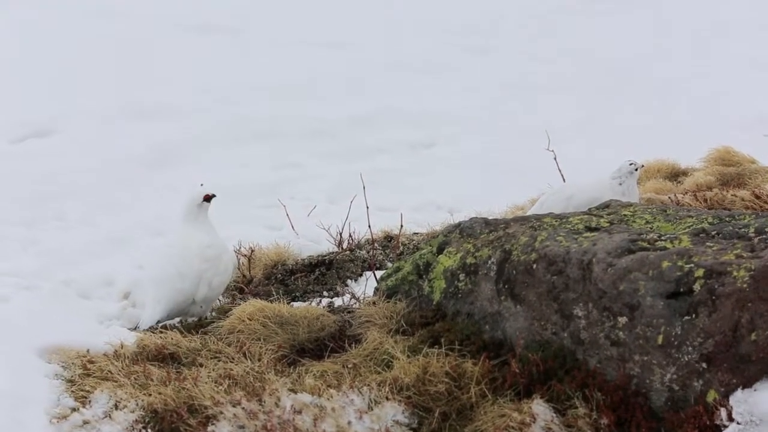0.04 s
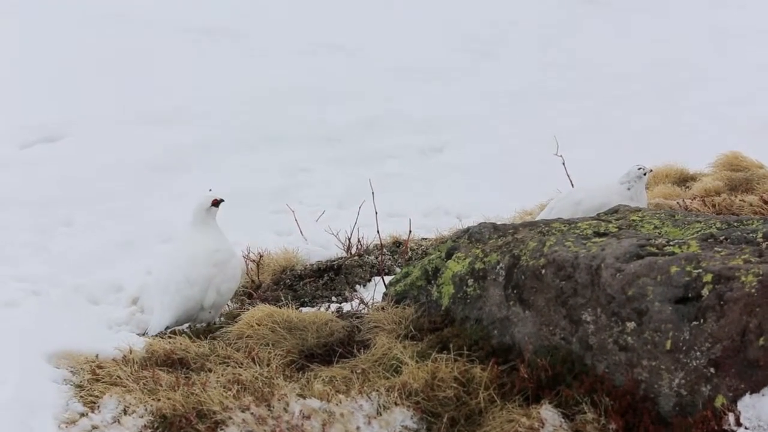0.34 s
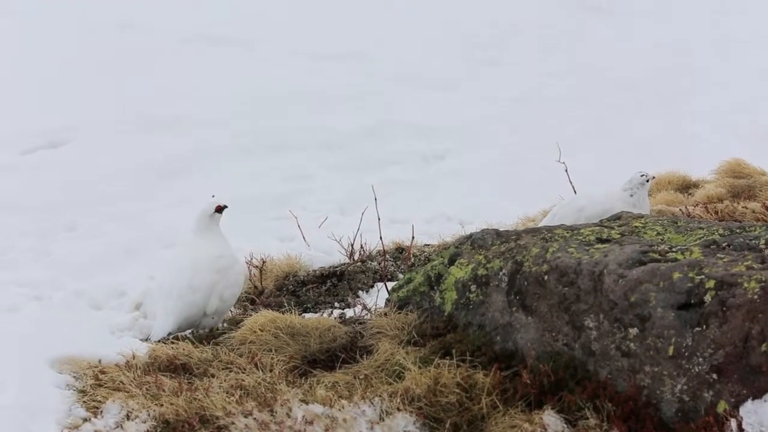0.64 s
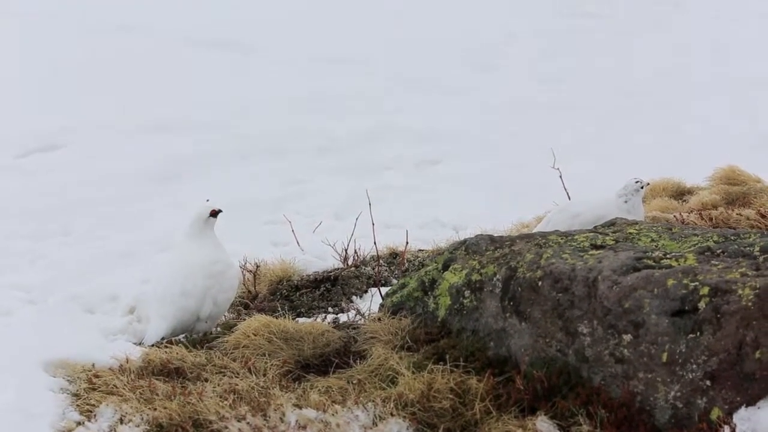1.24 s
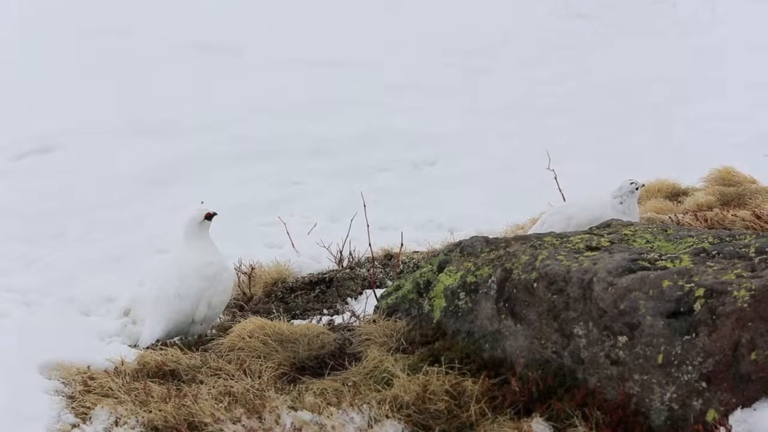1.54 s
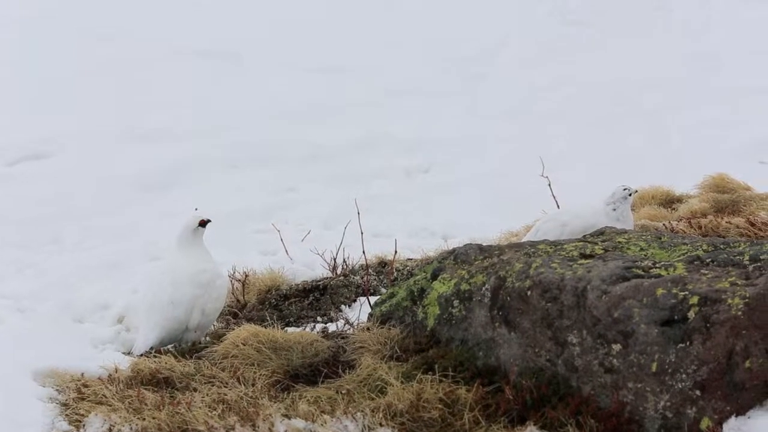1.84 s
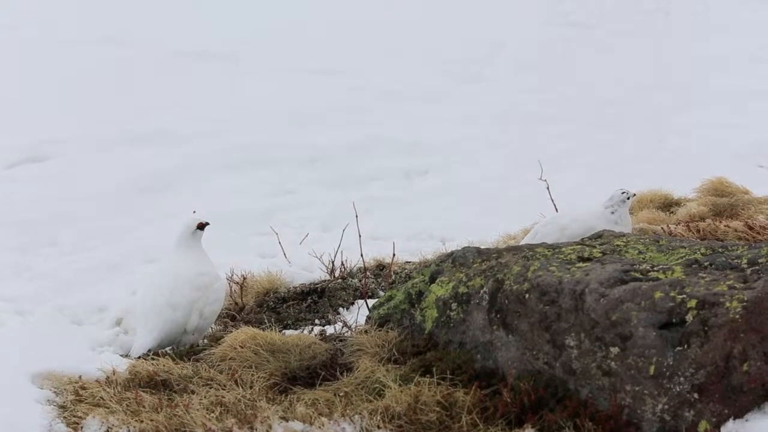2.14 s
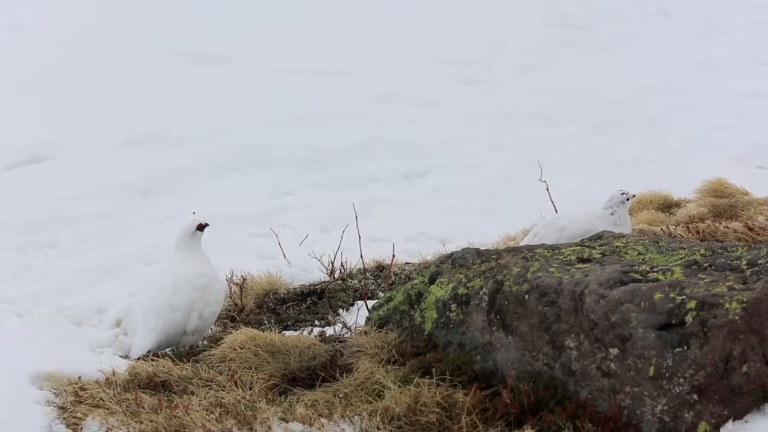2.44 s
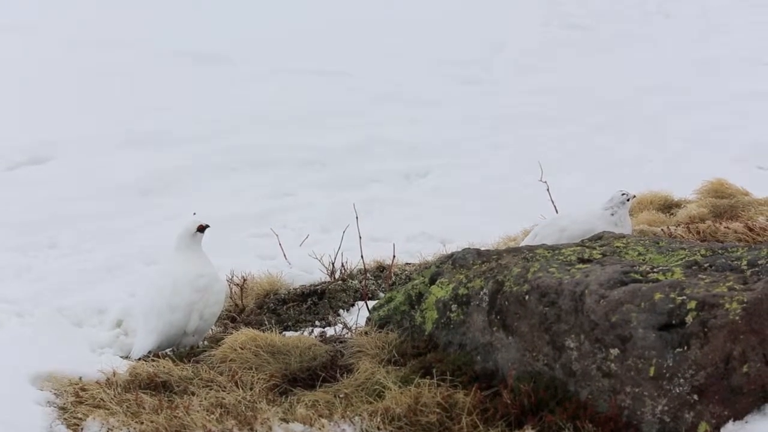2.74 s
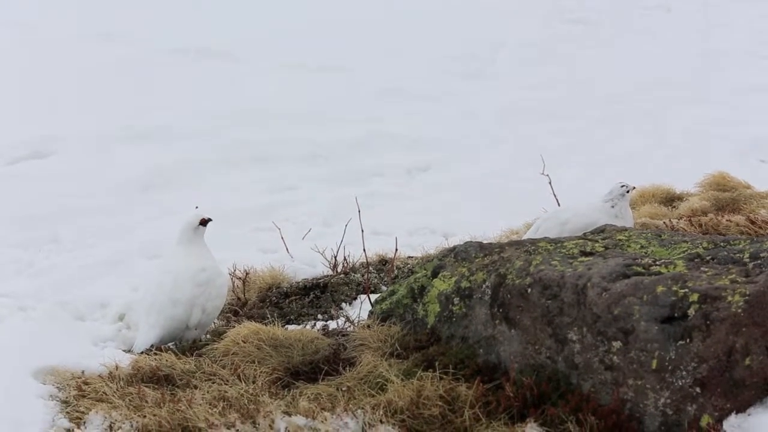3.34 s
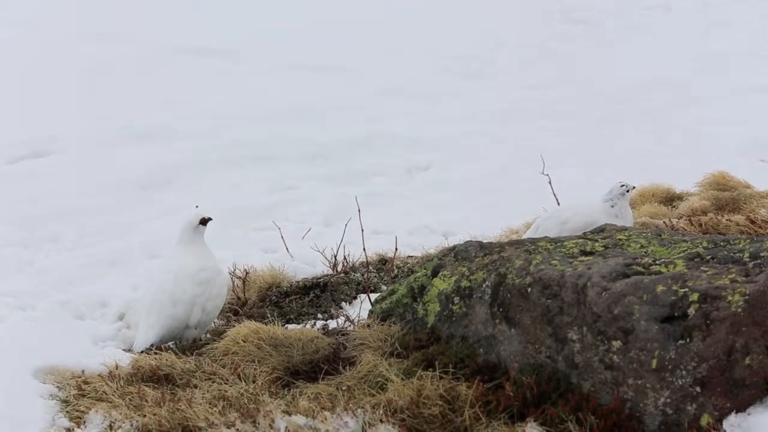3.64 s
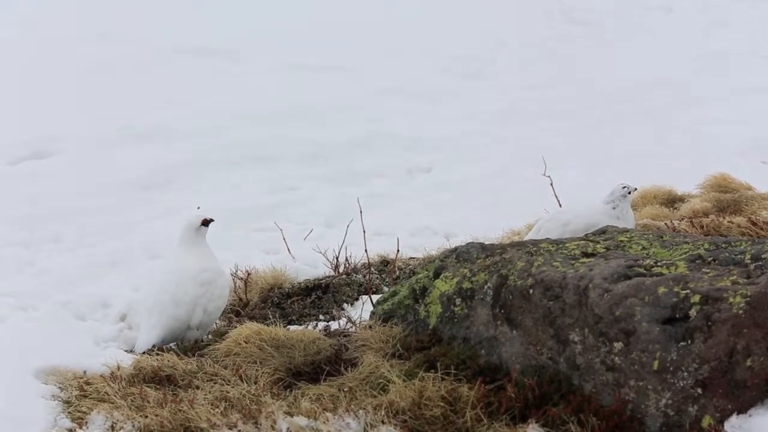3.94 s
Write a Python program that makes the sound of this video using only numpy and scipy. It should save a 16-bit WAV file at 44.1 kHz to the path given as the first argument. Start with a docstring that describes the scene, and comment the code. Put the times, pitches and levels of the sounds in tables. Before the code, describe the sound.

A ptarmigan gives low rattling croaks while wind rumbles on the microphone.

```python
"""A ptarmigan croaks on a snowy mountainside: two rattles of about 50 pulses/s and a few loose clucks.
Each pulse is a snap of the syrinx ringing three throat resonances; rock and snow scatter a faint tail.
Wind rumbles on the microphone, and single eddies thump across its port.
Handling ticks, faint crackle and one short rustle sound close by, over a steady hiss."""
import sys
import numpy as np
from scipy import signal
from scipy.fft import rfft, irfft, next_fast_len
from scipy.io import wavfile
from scipy.ndimage import map_coordinates

SR = 44100
rng = np.random.default_rng(int(sys.argv[2]) if len(sys.argv) > 2 else 0)


def transcribe(signal):
    """Save signal, clipped to [-1, 1], as a 16-bit WAV file at the path in sys.argv[1]."""
    frames = np.atleast_2d(signal).T
    limited = np.clip(frames, -1, 1)
    pcm = np.round(limited * 32767).astype(np.int16)
    wavfile.write(sys.argv[1], SR, pcm)


N = 176400
T = np.arange(N) / SR
NFFT = 4096
F_HZ = np.fft.rfftfreq(NFFT, 1 / SR)

# noise spectra: f/Hz, density/dB
HISS_SPECTRUM = [(290, -25), (500, 5), (648, 0), (839, 3.5), (927, -2), (1470, -3), (2100, -5), (2930, -7),
                 (11800, -11.5), (15500, -19.5)]
BRUSH_SPECTRUM = [(500, 5), (2500, -14), (4200, -8), (5100, -5.5), (6000, -14), (7200, -8), (10000, -14.5),
                  (16000, -23)]
RUMBLE_SPECTRUM = [(12, -58), (25, -2.5), (65, 2), (110, -0.5), (180, -8), (290, -18.5), (450, -31),
                   (700, -43), (1400, -75), (3000, -76)]
FLUTTER_SPECTRUM = [(60, -8), (180, -3), (300, 3), (550, -11), (800, -18), (1400, -28), (3000, -41)]
# envelopes: t/s, level/dB
HISS_ENVELOPE = [(0, -57.5), (.55, -54.5), (1.2, -53.5), (1.9, -55), (2.6, -53.5), (3.4, -52.5), (4, -54.5)]
WIND_ENVELOPE = [(0, -27), (.03, -25), (.06, -50), (.1, -33.5), (.15, -24.5), (.22, -40), (.26, -25.5),
                 (.33, -41.5), (.48, -30), (.6, -47), (.68, -28.5), (.78, -37), (.95, -35.5), (1.1, -32),
                 (1.2, -33.5), (1.3, -41.5), (1.43, -33.5), (1.5, -29), (1.55, -40), (1.66, -45),
                 (1.75, -32), (1.84, -46.5), (1.98, -27.5), (2.06, -27), (2.11, -21.5), (2.19, -21.5),
                 (2.25, -35), (2.3, -21.5), (2.38, -28), (2.44, -31), (2.53, -35), (2.57, -21),
                 (2.62, -33.5), (2.75, -35), (2.81, -23), (2.87, -36), (3.1, -38), (3.37, -38),
                 (3.45, -31.5), (3.69, -29.5), (3.75, -19.5), (3.87, -20), (3.93, -28), (4, -9.5)]
# brush strokes: centre t/s, sigma/s, level/dB
BRUSH_STROKES = [(0.102, 0.12, -47.5), (1.74, 0.051, -48.5), (1.832, 0.027, -55)]
# rustle snaps: t/s, peak/dB
RUSTLE_SNAPS = [(1.7312, -27.5), (1.743, -33), (1.75, -34), (1.7615, -25), (1.790, -33), (1.8011, -26),
                (1.816, -27), (1.8245, -28), (1.834, -34)]
# handling ticks: t/s, peak/dB, f/Hz, half-width/oct
HANDLING_TICKS = [(.297, -34.5, 7000, 0.56), (.333, -36, 2600, 0.76), (0.6678, -21.5, 11200, 0.24),
                  (0.767, -29.5, 1760, 0.6), (0.785, -36.5, 6000, .3), (.851, -23, 7000, 2.2),
                  (0.9028, -17.5, 2500, 1.1), (1.037, -26.5, 4000, 1.1), (1.369, -25, 1310, 0.48),
                  (1.525, -34.5, 3400, 0.55), (2, -28, 4000, 0.63), (2.0213, -16, 8460, 2.4),
                  (2.0647, -19, 2210, 0.78), (2.0952, -15, 2800, 1.04), (2.1297, -21, 9350, 1.1),
                  (2.5354, -28.5, 7450, .5), (2.563, -22, 1950, 0.54), (2.584, -23.5, 1700, 1),
                  (2.6105, -24, 13900, 0.11), (2.7066, -20.5, 4630, 0.44), (2.705, -19, 13500, 0.29),
                  (2.8095, -27, 8985, 0.89), (3.030, -29.5, 2600, 0.65), (3.1743, -23.5, 1800, 0.33),
                  (3.308, -26, 8900, 1), (3.4391, -23.5, 5800, 1.3), (3.472, -27, 9800, 0.76),
                  (3.7936, -27.5, 5800, .7), (3.9023, -28.5, 4900, 1.4)]
# eddies at the port: t/s, peak/dB, f/Hz
PORT_EDDIES = [(.004, -27, 169), (.02, -15, 99), (0.136, -6.5, 180), (0.1388, -9, 463), (0.201, -20.5, 107),
               (.25, -22.5, 145), (0.304, -26.5, 134), (.404, -23, 119), (0.4668, -22, 300),
               (0.683, -27, 193), (.747, -23.5, 125), (1.028, -27.5, 168), (1.13, -25, 142),
               (1.395, -27.5, 89.5), (1.5137, -10, 129.6), (2.104, -16.5, 196), (2.1569, -6.5, 167),
               (2.156, -19, 506), (2.329, -9.5, 96), (2.384, -18, 111), (2.488, -22, 177),
               (2.5567, -11.5, 153), (2.583, -19.5, 109), (2.818, -20.5, 294), (3.435, -20.5, 109),
               (3.668, -20, 109), (3.7652, -11.5, 265), (3.782, -14, 130), (3.831, -12.5, 180),
               (3.9011, -1.5, 175), (3.9001, -12.5, 574), (3.9965, -11, 145)]
# upper throat resonances: f/Hz, width/Hz, gain/dB
THROAT_MODES = [(2190, 135, 0), (2600, 220, -8)]
# rattles: t/s, pulse rate/Hz, peak/dB, throat tuning/ratio, hollow resonance gain/dB
SHORT_RATTLE = [(1.3685, 60, -28.5, 1.08, -3.5), (1.419, 56.6, -29, 0.96, -3),
                (1.519, 49.8, -33.5, 0.96, -1), (1.6, 55, -35.5, 0.96, 2)]
LONG_RATTLE = [(2.224, 45.65, -39, 1, -8), (2.287, 56.77, -34.5, 1, -9), (2.428, 51.83, -36.5, 1, -2.5),
               (2.568, 49.2, -38, 1.02, 9), (2.65, 47.06, -41.5, 1.04, 7), (2.739, 45.1, -39, 1.02, 5),
               (2.849, 49.9, -38, 0.97, 4), (2.998, 48.88, -35, 1.005, 0.5), (3.125, 44.2, -37, 0.96, -1)]
# clucks: t/s, peak/dB
LOOSE_CLUCKS = [(0.1192, -40), (0.1431, -38), (1.235, -32.5), (1.255, -30), (1.993, -30), (2.009, -31),
                (2.03, -34), (3.21, -39), (3.315, -38.5), (3.348, -37), (3.426, -37), (3.445, -39),
                (3.543, -37), (3.563, -42), (3.643, -43), (3.712, -43)]


def amp(db):
    """dB to gain."""
    return 10 ** (np.asarray(db) / 20)


def curve(rows):
    """Linear interpolation of (t/s, value) rows."""
    return np.interp(T, *np.transpose(rows))


def wobble(rate_hz):
    """Spline through Gaussian random knots."""
    return map_coordinates(rng.standard_normal(int(N * rate_hz / SR) + 4), [T * rate_hz])


def filtered(x, response):
    """FFT filter; response maps f/Hz to gain."""
    size = next_fast_len(N + SR // 4)
    return irfft(rfft(x, size) * response(np.fft.rfftfreq(size, 1 / SR)), size)[:N]


def butterworth(order, cutoff_hz, kind):
    """Complex analog response on F_HZ."""
    return signal.freqs(*signal.butter(order, cutoff_hz, kind, analog=True), F_HZ)[1]


def noise(spectrum):
    """Coloured noise, rms 1."""
    knots_hz, db = np.transpose(spectrum)
    white = rng.standard_normal(N)
    x = filtered(white, lambda hz: amp(np.interp(np.log(hz + 1), np.log(knots_hz + 1), db)))
    return x / np.sqrt(np.mean(x ** 2))


def add(out, at_s, peak_db, sound):
    """Mix in a sound, scaled to peak_db."""
    start = round(at_s * SR)
    sound = (amp(peak_db) * sound / np.abs(sound).max())[max(-start, 0):]
    part = out[max(start, 0):][:len(sound)]
    part += sound[:len(part)]


def hiss():
    """Broadband floor, drifting slightly in level."""
    return noise(HISS_SPECTRUM) * amp(curve(HISS_ENVELOPE))


def crack(centre_hz, half_width_oct, t60_s=0.0092, roughness=0.19):
    """Impulse plus fast-decaying noise, shaped by one wide-skirted spectral hump."""
    t, lead = T[:NFFT], SR // 2000
    burst = (t == 0) + roughness * rng.standard_normal(NFFT) * amp(-60 * t / t60_s)
    hump = 1 / (1 + (np.log2((F_HZ + 1) / centre_hz) / half_width_oct) ** 2)
    kernel = irfft(hump * butterworth(2, 920, "high"))
    return signal.fftconvolve(np.roll(burst, lead), np.roll(kernel, lead))[lead:NFFT // 2]


def handling(crackle_per_s=28, crackle_min_db=-35.5, crackle_hz=7000):
    """Soft brushing, dry ticks, a rustle of snaps and faint random crackle."""
    strokes = sum(amp(db) * np.exp(-.5 * ((T - at_s) / sigma_s) ** 2)
                  for at_s, sigma_s, db in BRUSH_STROKES)
    out = noise(BRUSH_SPECTRUM) * strokes
    for at_s, peak_db, centre_hz, half_width_oct in HANDLING_TICKS:
        add(out, at_s, peak_db, crack(centre_hz, half_width_oct))
    snap_lowpass = signal.butter(2, 10900, fs=SR)
    for at_s, peak_db in RUSTLE_SNAPS:
        snap = crack(centre_hz=4000, half_width_oct=0.9, t60_s=0.025, roughness=0.88)
        add(out, at_s, peak_db, signal.lfilter(*snap_lowpass, snap))
    for when, softness, colour in rng.random((int(crackle_per_s * N / SR), 3)):
        peak_db = crackle_min_db - np.log(max(softness, .02))
        add(out, when * N / SR, peak_db, crack(crackle_hz * 2 ** (colour - .5), half_width_oct=0.94))
    return out


def wind(lump_db=3, lump_rate_hz=35, gust_db=-25):
    """Lumpy rumble on the microphone; stronger gusts add higher turbulence."""
    level_db = curve(WIND_ENVELOPE)
    flutter_db = gust_db - 19 + 1.08 * (level_db - gust_db)  # 19 dB below the rumble at gust_db
    rumble = noise(RUMBLE_SPECTRUM) * amp(level_db + lump_db * wobble(lump_rate_hz))
    flutter = noise(FLUTTER_SPECTRUM) * amp(flutter_db + lump_db * wobble(lump_rate_hz))
    return rumble + flutter


def eddies(order=3.6):
    """One smooth suck and push of pressure per eddy; small ones pass faster. Higher order: more swings."""
    out = np.zeros(N)
    t = (np.arange(NFFT) - NFFT // 2) / SR
    for at_s, peak_db, centre_hz in PORT_EDDIES:
        pressure = np.imag((1 - 2j * np.pi * centre_hz * t / order) ** -(order + 1))
        add(out, at_s + t[0], peak_db, pressure)
    return out


def ground_scatter(call, t60_s=.04, gain_db=-16):
    """Faint diffuse tail off rock and snow."""
    tail = rng.standard_normal(NFFT) * amp(-60 * T[:NFFT] / t60_s)
    return amp(gain_db) * signal.fftconvolve(call, tail / np.linalg.norm(tail))[:N]


def throat_pulse(tuning, hollow_db, hollow_hz=960, hollow_width_hz=75):
    """One syrinx snap rings a steady hollow resonance and two upper ones that the bird tunes."""
    modes = [(hollow_hz, hollow_width_hz, hollow_db)]
    modes += [(hz * tuning, width_hz, db) for hz, width_hz, db in THROAT_MODES]
    ring = 0
    for k, (hz, width_hz, db) in enumerate(modes):
        damping = 1j * F_HZ * width_hz
        ring += (-1) ** k * amp(db) * damping / (hz ** 2 - F_HZ ** 2 + damping)
    return irfft(ring * butterworth(14, 2780 * tuning, "low") * butterworth(2, 600, "high"))


def ptarmigan(jitter_db=.5):
    """Rattles are trains of throat pulses; clucks are single pulses."""
    out = np.zeros(N)
    for rattle in (SHORT_RATTLE, LONG_RATTLE):
        knots_s, rate_hz, peak_db, tuning, hollow_db = np.transpose(rattle)
        t = T[(T >= knots_s[0]) & (T <= knots_s[-1])]
        cycles = np.cumsum(np.interp(t, knots_s, rate_hz)) / SR
        for at_s in np.interp(np.arange(cycles[-1]), cycles, t):  # one pulse per cycle
            pulse = throat_pulse(np.interp(at_s, knots_s, tuning), np.interp(at_s, knots_s, hollow_db))
            add(out, at_s, np.interp(at_s, knots_s, peak_db) + jitter_db * rng.normal(), pulse)
    for at_s, peak_db in LOOSE_CLUCKS:
        add(out, at_s, peak_db, throat_pulse(tuning=1.008, hollow_db=-3))
    return out


def scene():
    """Mono mix: bird over hiss, wind and handling."""
    background = hiss() + wind() + eddies()
    bird = ptarmigan()
    return (background + ground_scatter(bird) + handling() + bird)[None]


def record(dry):
    """Brick-wall low-pass, 15.9 kHz."""
    return filtered(dry[0], lambda hz: hz < 15900)[None]


dry = scene()
out = record(dry)
transcribe(out)
```